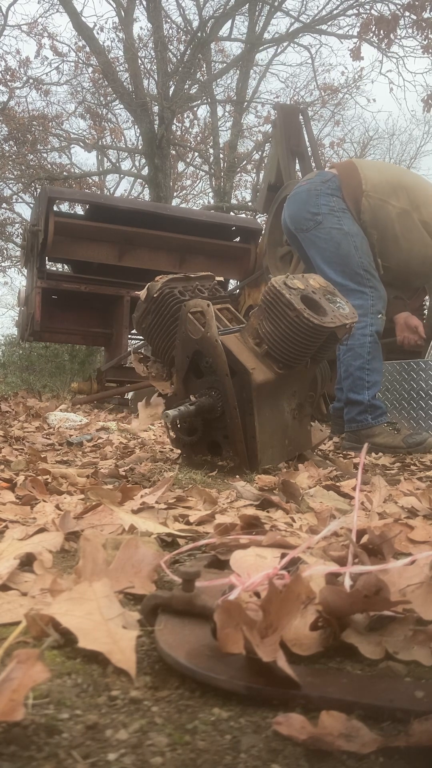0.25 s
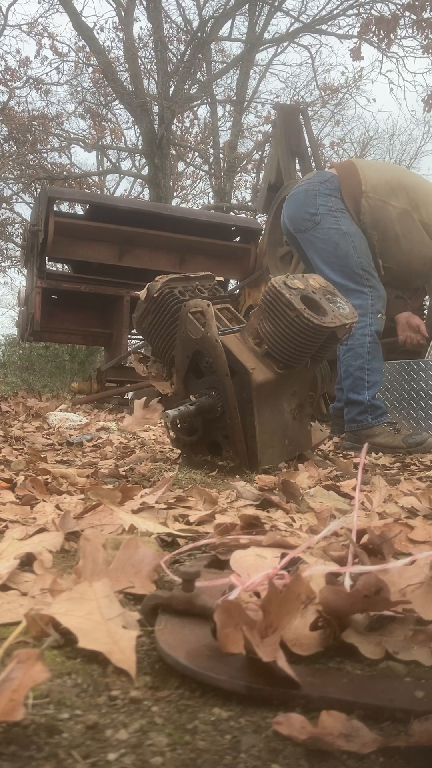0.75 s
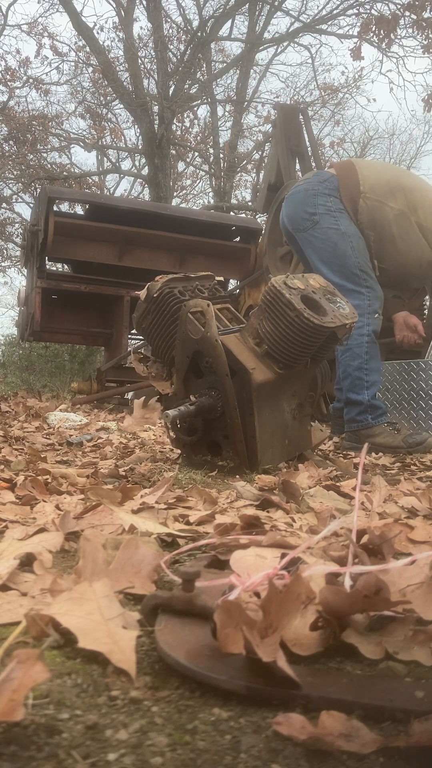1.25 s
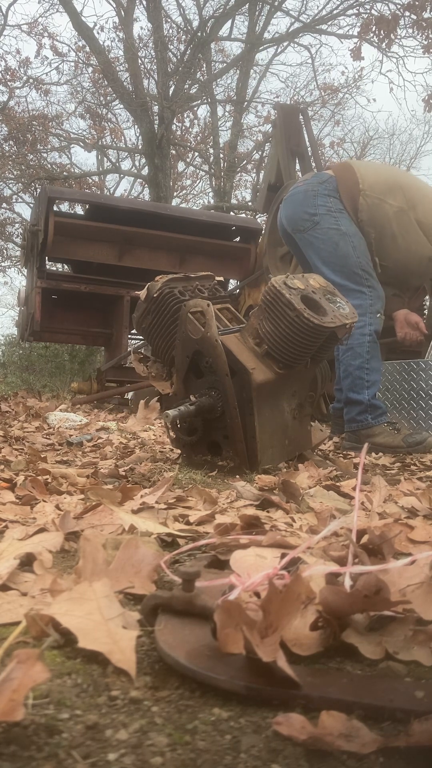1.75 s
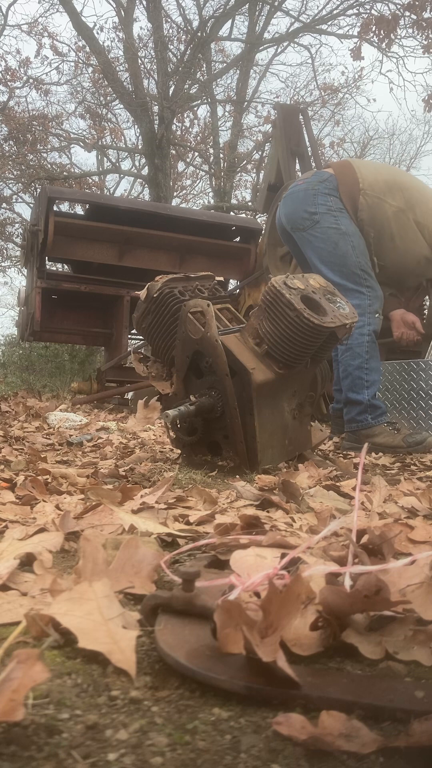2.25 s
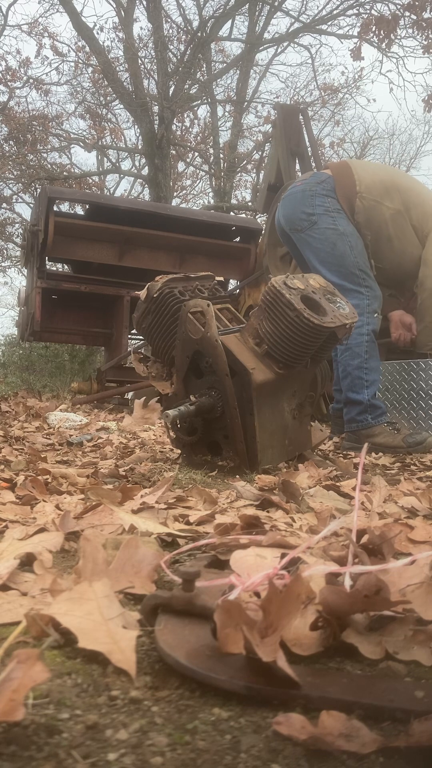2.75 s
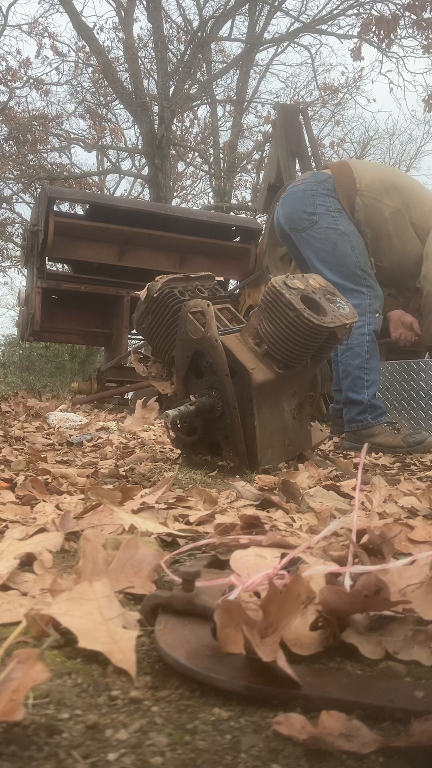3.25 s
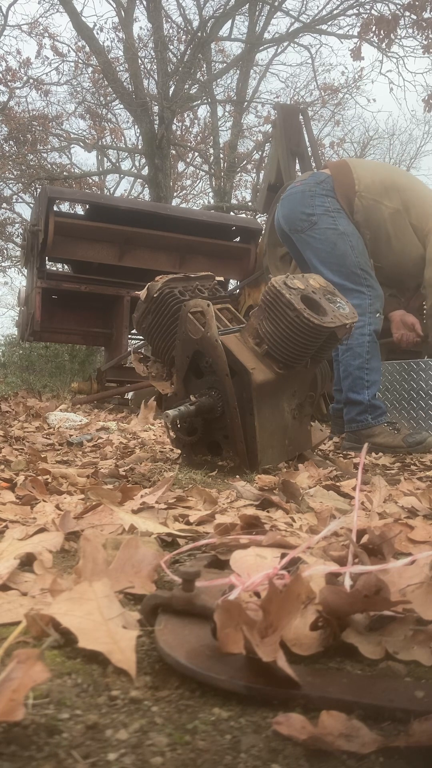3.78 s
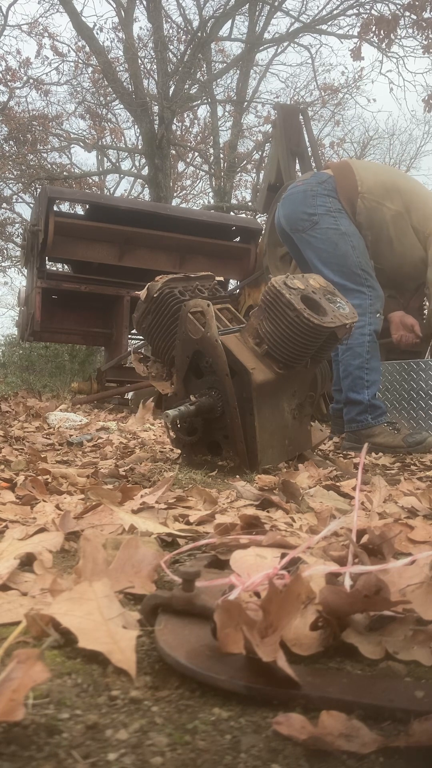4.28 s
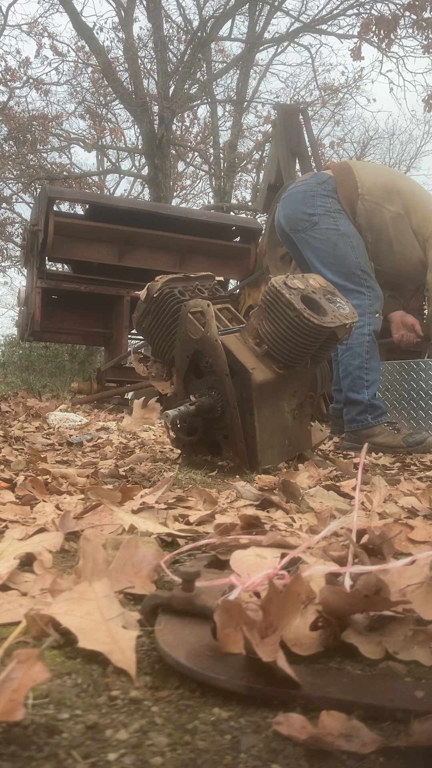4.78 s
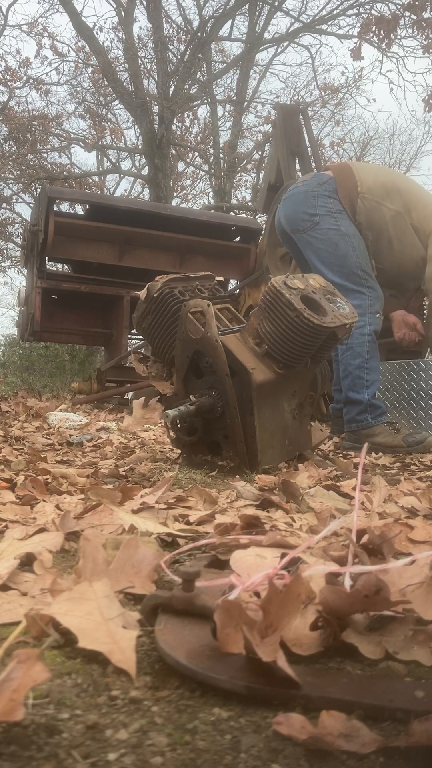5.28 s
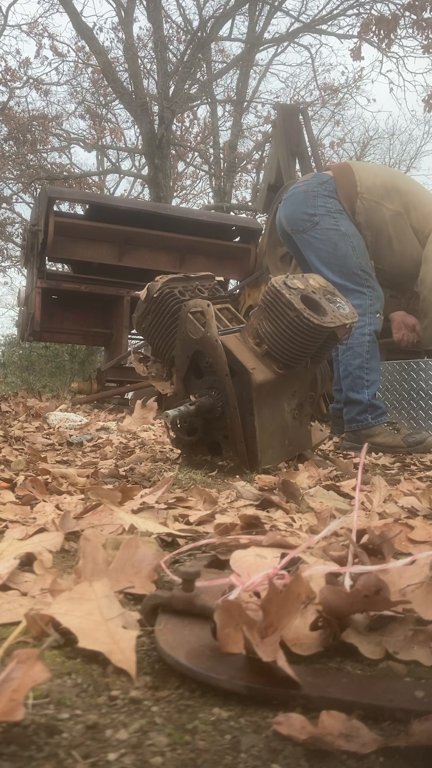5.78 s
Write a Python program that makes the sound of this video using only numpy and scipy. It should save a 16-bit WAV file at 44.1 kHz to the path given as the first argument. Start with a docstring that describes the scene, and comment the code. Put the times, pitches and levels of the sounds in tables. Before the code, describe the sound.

Metal hand tools clatter and clink as a hand rakes through a sheet-metal toolbox outdoors, its panels booming, faint traffic rumble behind.

```python
"""Raking through a metal toolbox

Hand tools are raked about in a sheet-metal toolbox outdoors, heard by the two microphone ports of a phone.
Filtered noise makes the far traffic. Decaying tones make single tools ring and the box panels boom.
Dense random impacts make steel clatter on steel, swelling whenever the hand sweeps through the heap."""
import sys
import numpy as np
from scipy import signal
from scipy.fft import rfft, irfft, next_fast_len
from scipy.io import wavfile
from scipy.ndimage import uniform_filter1d

SR = 44100
rng = np.random.default_rng(int(sys.argv[2]) if len(sys.argv) > 2 else 0)


def digitize_waveform(pressure):
    """Quantize a signal to 16-bit integers and store it at the path in sys.argv[1].

    Rows of a 2-D input are taken as channels; values are limited to [-1, 1].
    """
    field = np.atleast_2d(pressure).T
    bounded = np.clip(field, -1, 1)
    quanta = np.round(bounded * 32767).astype(np.int16)
    wavfile.write(sys.argv[1], SR, quanta)


N = 265482
T = np.arange(N) / SR


def undb(db):
    """Turn decibels into an amplitude factor."""
    return 10 ** (np.asarray(db, float) / 20)


def shape(x, gain):
    """Filter by a gain given as a function of Hz."""
    size = next_fast_len(N, True)
    hz = np.arange(size // 2 + 1) * SR / size + 1e-3
    return irfft(rfft(x, size) * gain(hz), size)[..., :N]


def colour(table):
    """Make a gain curve through (Hz, dB) points."""
    hz, db = np.transpose(table)
    return lambda f: undb(np.interp(np.log(f), np.log(hz), db))


def unit(x):
    """Scale to an rms level of 1."""
    return x / np.sqrt(np.mean(x ** 2))


def ring(x, hz, t60):
    """One tone that dies by 60 dB in t60 seconds; a unit click gives a peak near 1."""
    r = np.exp(-np.log(1000) / (t60 * SR))
    w = 2 * np.pi * hz / SR
    return signal.lfilter([0, np.sin(w)], [1, -2 * r * np.cos(w), r * r], x)


def clicks(s, size):
    """Single-sample impulses of the given sizes at the given seconds."""
    place = np.clip((np.asarray(s) * SR).astype(int), 0, N - 1)
    return np.bincount(place, size, N)


def grit(rate, spread_db):
    """Random impacts, about `rate` per second, a few much harder than the rest."""
    hit = rng.random(N) < rate / SR
    return unit(hit * rng.standard_normal(N) * undb(spread_db * rng.exponential(size=N)))


def walk(rate):
    """Slow wavering: `rate` random levels a second, joined by smooth slides."""
    k = int(SR / rate)
    steps = np.repeat(rng.standard_normal(N // k + 1), k)
    return unit(uniform_filter1d(steps, k)[:N])


# Tone colour of the far traffic. Each row: frequency in Hz, relative level in dB per Hz.
TRAFFIC_COLOUR = [(20, -16), (40, -7), (70, 8), (95, 3.5), (140, -2), (300, -10), (700, -11), (1500, -31.5),
                  (3000, -34), (6000, -45.5), (12000, -77), (16000, -78)]
TRAFFIC_DB, HUM_HZ, HUM_DB = -45, 71.6, -53.5


def traffic():
    """Far road rumble is shaped noise, drawn twice; noise ringing one low tone is the wavering engine hum."""
    rumble = np.array([unit(shape(rng.standard_normal(N), colour(TRAFFIC_COLOUR))) for _ in range(2)])
    hum = unit(ring(rng.standard_normal(N), HUM_HZ, .8))
    return undb(TRAFFIC_DB) * rumble + undb(HUM_DB) * hum


# Ringing tones of each solid tool, listed under its name.
# Each row: frequency in Hz, relative level in dB, time to die by 60 dB in s before damping.
TOOL_TONES = { "spanner": [(4150, -11, .16), (6987, 0, .16), (7827, -9, .1), (8490, -10, .12),
              (12090, -9, .14), (13415, -8, .1)], "socket": [(5830, -13, .35), (6765, -4, .4),
              (9065, -10, .25), (10297, 0, .35), (10917, -6, .45), (11670, -5, .15), (12435, -12, .15),
              (14240, -2, .3), (15019, -7, .4)], "chisel": [(4414, -16, .15), (5824, 0, .35),
              (8161, -7, .3), (8731, -12, .15), (11003, -9, .25), (12230, -9, .25), (13587, -19, .25),
              (15374, -20, .25)], "bit": [(13975, 0, .3), (14190, -4, .25)], "punch": [(3477, -9, .25),
              (11460, 0, .35)], "pliers": [(10470, 0, .25), (12198, -5, .18), (14760, -8, .18)],
              "nut": [(14965, -5, .3), (15180, 0, .3)], "bolt": [(7500, -4, .12), (8500, 0, .13)], }
# Tools that ring clearly. Each row: start in seconds, tool name, level in dB.
TOOL_RINGS = [(0.073, "bolt", -35), (0.166, "bolt", -31), (0.249, "bolt", -41.5), (.335, "bit", -42),
              (.35, "bit", -30), (0.547, "pliers", -45), (0.658, "pliers", -48), (0.816, "spanner", -24),
              (1.062, "chisel", -39), (1.089, "chisel", -40.5), (1.29, "pliers", -44.5),
              (1.331, "bolt", -33), (1.38, "spanner", -26.5), (1.41, "spanner", -31),
              (1.431, "pliers", -38.5), (1.688, "punch", -47), (1.99, "bolt", -39),
              (2.132, "spanner", -27.5), (2.134, "bolt", -24.5), (2.175, "pliers", -27.5),
              (2.21, "punch", -39), (2.326, "punch", -40), (2.504, "punch", -46), (2.668, "pliers", -43),
              (2.712, "pliers", -44), (3.593, "socket", -32.5), (3.632, "spanner", -30),
              (3.712, "punch", -32), (4.665, "pliers", -43), (4.764, "pliers", -36), (4.8, "socket", -32.5),
              (4.845, "socket", -31), (4.897, "socket", -28), (4.951, "socket", -35),
              (5.145, "socket", -53), (5.348, "spanner", -35.5), (5.388, "pliers", -21),
              (5.388, "socket", -24), (5.452, "pliers", -35), (5.51, "socket", -30), (5.55, "socket", -31),
              (5.586, "socket", -43.5), (5.963, "nut", -36)]
RING_RISE_T60_S = 0.029  # a tool is set ringing over a few ms, not at one instant


def tools(scatter_db=1.5, chatter_s=.04, chatter_db=-4.0, split_hz=35., damped=.48, waver_db=3.5):
    """Solid steel rings on a few high tones, each a close pair; chattering neighbours damp it unevenly."""
    chance = rng.standard_normal((len(TOOL_RINGS), 9))
    touches = grit(rate=550.0, spread_db=3.5)
    waver = undb(waver_db * np.minimum(walk(rate=42.0), 1))
    out = 0
    for name, modes in TOOL_TONES.items():
        rows = [k for k, row in enumerate(TOOL_RINGS) if row[1] == name]
        s, db = np.transpose([(TOOL_RINGS[k][0], TOOL_RINGS[k][2]) for k in rows])
        for m, (hz, mode_db, t60) in enumerate(modes):
            blow = clicks(s, undb(db + mode_db + scatter_db * chance[rows, m]))
            settle = signal.lfilter([1], [1, -np.exp(-1 / (chatter_s * SR))], blow)
            chatter = undb(chatter_db) * settle * touches / np.sqrt(chatter_s * SR)
            lower = ring(blow + chatter, hz, damped * t60)
            upper = ring(blow - chatter, hz + split_hz, damped * t60 / 2)
            # ringing a second time softens the start; the factor restores the level
            pair = ring(lower + upper, hz, RING_RISE_T60_S)
            pair = pair * 2 * np.log(1000) / (RING_RISE_T60_S * SR)
            out = out + pair * np.roll(waver, int(hz))  # each tone is damped at its own moments
    return out


# Sweeps of the hand through the heap. Each row: moment of full force in seconds, time held in seconds,
# panel rumble in dB, rattle in dB, rattle treble in dB.
HAND_SWEEPS = [(0.105, .06, -31.5, -37, -31.5), (0.41, .4, -45.5, -54, -59.5),
               (1.362, 0.086, -29.5, -33, -35), (2.066, 0.062, -26, -37, -36),
               (2.302, .15, -35, -51.5, -62), (2.776, .12, -32.5, -40, -53),
               (3.593, .04, -33.5, -40.5, -41.5), (4.068, .07, -40, -52, -70),
               (4.761, .17, -31, -36, -35.5), (5.427, .08, -29, -33.5, -35.5)]
RISE_SLOPE, FADE_SLOPE = 113.5, 127  # dB per s, before each layer's own steepness


def stir(column, steep):
    """Level of the hand's sweeps: all swell, hold and fade at the same rates, and add as power."""
    power = 0
    for row in HAND_SWEEPS:
        full_s, hold_s = row[:2]
        before = np.maximum(full_s - T, 0)
        after = np.maximum(T - full_s - hold_s, 0)
        slack_db = RISE_SLOPE * before + FADE_SLOPE * after
        power = power + undb(row[column] - steep * slack_db) ** 2
    return np.sqrt(power)


# small clinks inside the sweeps: level over the rattle, its spread, ring-out
CLINK_DB, CLINK_SPREAD_DB, CLINK_T60_S = 3.5, 0.5, 0.24
LUMP_SPAN = 2.8  # ratio from the lowest to the highest pitch of small parts


def clinks(rattle, treble, count=40):
    """Extra clack rows drawn by chance, thickest where the heap rattles most."""
    when, size, tone = rng.random((count, 3)).T
    busy = np.cumsum(np.sqrt(rattle))
    targets = busy[-1] * (np.arange(count) + when) / count
    i = np.searchsorted(busy, targets).clip(0, N - 100)
    db = 20 * np.log10(rattle[i]) + CLINK_DB - CLINK_SPREAD_DB * np.log(1 - size)
    treble_db = 20 * np.log10(treble[i] / rattle[i])
    return list(zip(T[i], db, treble_db, np.full(count, CLINK_T60_S), 1300.0 * LUMP_SPAN ** tone))


PATCHY_DB, PATCHES_PER_S = 2.5, 30


def patchy(x, count=7):
    """Other pieces slide at each moment: every band of the rattle swells and dips on its own."""
    centres = np.linspace(np.log2(700.), np.log2(15000.), count)

    def band(k):
        return lambda f: np.interp(np.log2(f), centres, np.arange(count) == k)

    return sum(undb(PATCHY_DB * walk(rate=PATCHES_PER_S)) * shape(x, band(k)) for k in range(count))


# Steel hitting steel. Each row: start in seconds, level in dB, treble in dB against that level,
# time for the rattle to die by 60 dB in s, clank pitch in Hz.
STEEL_CLACKS = [(0.0256, -32.5, -9, 0.2, 3000), (0.0402, -30, -2, 0.35, 1920),
                (0.0688, -27, -2, 0.32, 2900), (0.169, -30, -9, 0.22, 3200), (0.2507, -40, 1, 0.23, 2080),
                (0.27, -37, -3, 0.094, 2100), (0.334, -29, -6.5, 0.22, 1870),
                (0.4663, -27.5, -8.5, 0.21, 1060), (0.544, -34, 4, 0.12, 1800),
                (0.651, -40.5, 0.5, 0.19, 3040), (0.6755, -27, -6.5, 0.16, 3070),
                (0.8145, -17.5, -5.5, 0.2, 2425), (0.892, -28, -34, 0.099, 1350),
                (0.9383, -33.5, -11, 0.22, 3150), (1.0365, -31.5, -11, 0.33, 1070),
                (1.069, -21.5, -7, 0.17, 1430), (1.2342, -29, -7, 0.11, 1720),
                (1.2515, -27.5, -11, 0.18, 3080), (1.287, -29, -6.5, 0.42, 2685),
                (1.3803, -18, -10, 0.085, 2750), (1.4112, -39, 10, 0.066, 1790),
                (1.5122, -25, -4, 0.12, 2680), (1.6842, -26, -4, 0.19, 1380),
                (1.7444, -17.5, -12.5, 0.14, 1310), (1.912, -26, -9, 0.15, 1170),
                (1.93, -25, -12, 0.086, 1840), (1.95, -25.5, -1.5, 0.21, 1630),
                (1.9915, -32.5, 6, 0.41, 1890), (2.0486, -24, 0.5, 0.084, 1480),
                (2.078, -37, -6, 0.079, 2880), (2.131, -24.5, 2.5, 0.36, 2660),
                (2.176, -27.5, 3.5, 0.2, 2630), (2.3047, -28, -36, 0.12, 1400),
                (2.327, -27.5, -15, 0.19, 2730), (2.389, -29.5, -35, 0.054, 1870),
                (2.4403, -31, -13, 0.11, 1880), (2.5032, -43.5, -1.5, 0.38, 2750),
                (2.5427, -33, -30, 0.19, 1230), (2.6448, -25.5, -18, 0.16, 1800),
                (2.6728, -35, -1, 0.19, 1630), (2.712, -27.5, -5.5, 0.089, 1700),
                (2.7467, -30, -28, 0.14, 1810), (2.844, -30.5, -4, 0.35, 1190),
                (2.9402, -30, -10.5, 0.25, 1430), (3.0048, -37.5, -9, 0.22, 2430),
                (3.1565, -21, -3, 0.11, 1870), (3.1777, -31, 4.5, 0.17, 2080),
                (3.261, -26.5, -1, 0.28, 1830), (3.389, -38, -12.5, 0.24, 1470),
                (3.489, -37, -17, 0.58, 1550), (3.5473, -32, -4, 0.34, 1380),
                (3.5902, -28.5, -1.5, 0.073, 1590), (3.631, -30, 4, 0.084, 3330),
                (3.713, -33.5, -3, 0.31, 3360), (3.9125, -45, -18, 0.37, 1900),
                (3.9461, -38, -15.5, 0.67, 1810), (4.0098, -29.5, -4, 0.36, 1480),
                (4.087, -38.5, 2, 0.067, 1980), (4.16, -31, -16.5, 0.29, 1270),
                (4.4952, -40.5, -11.5, 0.15, 1570), (4.586, -33, -11.5, 1, 1726),
                (4.6668, -31, 4.5, 0.17, 1900), (4.732, -23.5, -29, 0.25, 1250),
                (4.81, -29.5, 1, 0.23, 3060), (4.844, -23.5, -11, 0.38, 1210),
                (4.8845, -27, -3.5, 0.42, 3240), (5.1463, -39.5, -8, 0.14, 1880),
                (5.178, -42, -18, 0.12, 2020), (5.3173, -36, -9.5, 0.28, 3080),
                (5.3497, -26.5, -6, 0.21, 1150), (5.3724, -22.5, 0.5, 0.57, 1110),
                (5.3884, -7, -9, 0.085, 1730), (5.451, -10.5, -7.5, 0.077, 2870),
                (5.5077, -14.5, -3, 0.053, 1620), (5.5453, -38, 3.5, 0.27, 2540),
                (5.9399, -29.5, -25, 0.2, 1220), (5.963, -38, -10, 0.12, 1580)]
# Tone colour of the rattle. Each row: frequency in Hz, relative level in dB.
RATTLE_COLOUR = [(500, 1), (900, 10.5), (1500, 3.5), (2200, -14.5), (2900, -8.5), (3800, -21.5),
                 (5500, -24.5), (7000, -22), (11000, -22.5), (14800, -9.5), (15800, -32)]
RATTLE_STEEPER = 1.5  # the rattle rises and fades this many times faster in dB
LUMP_T60_S, JINGLE_HZ = .018, 6200.
JINGLE_FADE_S = 0.093  # small parts come to rest before the rattle ends


def clatter(split_hz=3540.0, crack_s=0.0015, crack_db=-5.0, rise_s=0.0024, clank_t60=0.041,
            parts_t60=0.03, air_hz=11600.0, hard_db=-24.5, under_peak_db=-4.5):
    """Each clack is a crack, a clank, jolted small parts and a dying rattle; the rattle is drawn twice."""
    rattle = stir(column=3, steep=RATTLE_STEEPER)
    treble = stir(column=4, steep=RATTLE_STEEPER)
    rows = STEEL_CLACKS + clinks(rattle, treble)
    low, high = rattle ** 2, treble ** 2  # power of the dull and bright rattle
    pieces = np.zeros(N)
    jolts = grit(rate=1500.0, spread_db=0.9)
    pitch = rng.random((len(rows), 8))
    for (s, db, treble_db, t60, hz), chance in zip(rows, pitch):
        i = int(s * SR)
        t = T[:min(N - i, SR // 4)]
        here = slice(i, i + len(t))
        crack = undb(crack_db) ** 2 * np.exp(-t / crack_s)
        decay = 10 ** (-6 * t / max(t60, .02))
        power = undb(db + under_peak_db) ** 2 * (1 - np.exp(-t / rise_s)) * (decay + crack)
        low[here] += power
        high[here] += power * undb(treble_db) ** 2
        # the pieces that were struck sound their own tones at every jolt while they settle
        shake = jolts[here]
        clank = unit(ring(shake, hz, clank_t60))
        lumps = unit(sum(ring(shake, 1200. * LUMP_SPAN ** c, LUMP_T60_S) for c in chance[:3]))
        jingle = unit(sum(ring(shake, JINGLE_HZ * 2.4 ** c, parts_t60) for c in chance[3:]))
        jingle = undb(treble_db - 6.5) * jingle * np.exp(-t / JINGLE_FADE_S)
        pieces[here] += np.sqrt(power) * (undb(-10.5) * clank + undb(-10.0) * lumps + jingle)
    # two draws, as the two ports hear the heap unalike
    impacts = np.array([grit(rate=3500., spread_db=1.5) for _ in range(2)])
    grains = patchy(shape(impacts, colour(RATTLE_COLOUR)))
    dull = shape(grains, lambda f: 1 / (1 + (f / split_hz) ** 4))
    bright = unit(grains - dull)
    air = shape(bright, lambda f: 1 / (1 + (air_hz / f) ** 12))
    # only hard contacts reach the very top
    hard = np.minimum((high / undb(hard_db) ** 2) ** 0.84, 1)
    crisp = bright - (1 - hard) * air
    # the heap slips in fits, so the rattle comes in clumps
    fits = undb(1.9 * walk(rate=70.))
    return fits * (np.sqrt(low) * unit(dull) + np.sqrt(high) * crisp) + pieces


# Blows on the box panels. Each row: start in seconds, level in dB, favoured panel tone in Hz.
PANEL_BLOWS = [(0.046, -22, 484), (0.085, -24, 339), (0.124, -23, 237), (0.181, -19, 250),
               (0.265, -29, 418), (0.335, -37, 340), (0.471, -25.5, 220), (0.543, -30.5, 605),
               (0.68, -33.5, 322), (0.816, -13, 230), (0.892, -22.5, 296), (0.944, -25.5, 234),
               (1.037, -16.5, 372), (1.062, -22.5, 243), (1.081, -17.5, 290), (1.24, -22.5, 191),
               (1.329, -16.5, 335), (1.379, -16, 605), (1.438, -19, 231), (1.515, -20, 220),
               (1.552, -27, 336), (1.609, -28, 374), (1.69, -21, 250), (1.748, -24, 333), (1.917, -23, 190),
               (1.932, -24.5, 470), (1.996, -20, 340), (2.148, -16.5, 505), (2.181, -19.5, 322),
               (2.263, -18.5, 245), (2.308, -15, 326), (2.344, -25, 331), (2.389, -18, 334),
               (2.441, -27.5, 360), (2.532, -26, 464), (2.647, -19, 193), (2.868, -27.5, 453),
               (2.942, -29, 324), (3.163, -17.5, 235), (3.264, -20, 504), (3.313, -17.5, 212),
               (3.396, -25.5, 200), (3.495, -18.5, 447), (3.514, -21.5, 450), (3.534, -21, 484),
               (3.724, -19, 448), (4.013, -28.5, 534), (4.163, -26.5, 358), (4.614, -29.5, 474),
               (4.67, -19.5, 313), (4.735, -19, 457), (4.799, -29, 554), (4.825, -13, 435),
               (4.896, -17.5, 560), (5.178, -34, 232), (5.284, -23.5, 187), (5.373, -17.5, 545),
               (5.402, -14.5, 190), (5.424, -24, 237), (5.455, -19, 427), (5.509, -24.5, 574),
               (5.593, -30, 466), (5.942, -29.5, 550)]
# Tones of the sheet-metal panels. Each row: frequency in Hz, relative level in dB,
# time to die by 60 dB in s.
PANEL_TONES = [(117, -37, 0.12), (189.7, -7, 0.16), (231.3, -6.5, 0.21), (278, -9, 0.098),
               (332.5, -0.5, 0.18), (420.4, -4, 0.15), (467.9, 1.5, 0.11), (560, 3, 0.087),
               (606.7, -2, 0.1), (685, -4, 0.092), (950, -10.5, 0.16), (910, -6.5, 0.033),
               (1020, -24, 0.11), (1253, -9.5, 0.17)]


def box(focus_db=9.0, focus_oct=0.2, push_s=0.00066, scatter_db=2.5, snap_hz=880.0, snap_t60=.008,
        snap_db=-8.0, mode_share_db=-10.5):
    """Each blow drives all panel tones, most those near its own; the sliding heap drums on them too."""
    s, db, tone = np.transpose(PANEL_BLOWS)
    chance = rng.standard_normal((len(s), 2 * len(PANEL_TONES)))
    blows = rumble = 0
    drumming = grit(rate=300., spread_db=3.0)
    for k, (hz, mode_db, t60) in enumerate(PANEL_TONES):
        near_db = focus_db * np.exp(-(np.log2(tone / hz) / focus_oct) ** 2)
        size = undb(db + mode_db + near_db + scatter_db * chance[:, k] + mode_share_db)
        size = size * np.sign(chance[:, -k - 1])
        late = 0.00215 * np.abs(chance[:, -k - 1])  # the tool lands along its length, not at one instant
        blows = blows + ring(clicks(s + late, size), hz, t60)
        shifted = np.roll(drumming, rng.integers(N))
        rumble = rumble + undb(mode_db) * ring(shifted, hz, t60)
    # the flat of the panel snaps at once, before the modes build up
    snap = ring(clicks(s, undb(db + snap_db)), snap_hz, snap_t60)
    push = np.hanning(int(push_s * SR) + 3)  # a short push instead of a bare click
    softened = np.convolve(blows, push / push.sum())[:N]
    return softened + snap + stir(column=2, steep=0.98) * unit(rumble)


# How the two microphone ports differ. Each row: frequency in Hz, left lag in turns of the wave
# (before the steady lead below), left minus right in dB, likeness of the two from 0 to 1.
PORT_DIFFERENCES = [(0, 0.042, -1.5, 1), (146, 0.027, 0.5, 0.89), (450, 0.32, -3, 0.97), (914, 0.612, 1, 1),
                    (1525, 0.77, -0.5, 0.97), (1990, 0.95, -2, 0), (2800, 1.002, -2, 0.9),
                    (3480, 1.137, -2, 0), (5180, 1.425, 1, 0.7), (5845, 1.986, 1, 1), (7880, 2.025, 0, 1),
                    (10600, 1.93, 0.5, 0.52), (11280, 1.815, 0.5, 1), (13800, 1.68, 1.5, 1),
                    (16500, 1.8, -13.5, .93)]
LEFT_LEADS_S = 0.00011


def two_ports(solid, shared, own):
    """The left port hears its own level and timing at each pitch, and partly its own mix of the noise."""
    hz, turns, db, alike = np.transpose(PORT_DIFFERENCES)

    def port(f):
        turn = f * LEFT_LEADS_S - np.interp(f, hz, turns)
        return undb(np.interp(f, hz, db)) * np.exp(2j * np.pi * turn)

    def share(f):
        return np.clip(np.interp(f, hz, alike), 0, 1)

    left = solid + shape(shared, share) + shape(own, lambda f: np.sqrt(1 - share(f) ** 2))
    return np.array([shape(left, port), solid + shared])


def scene():
    """Box and tools reach both ports alike; clatter and traffic reach them partly unalike."""
    shared, own = clatter() + traffic()
    solid = box() + tools()
    return two_ports(solid, shared, own)


TOP_HZ = 15900


def record(dry):
    """The deepest bass is thinned and the top cut; a gentle limit keeps the loudest clacks from clipping."""
    thin = signal.sosfilt(signal.butter(3, 30., "high", fs=SR, output="sos"), dry)
    limited = np.tanh(thin)
    return signal.sosfilt(signal.ellip(10, .2, 80, TOP_HZ, fs=SR, output="sos"), limited)


dry = scene()
out = record(dry)
digitize_waveform(out)
```